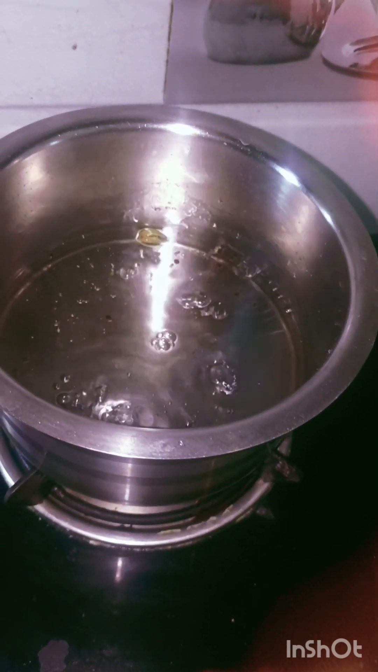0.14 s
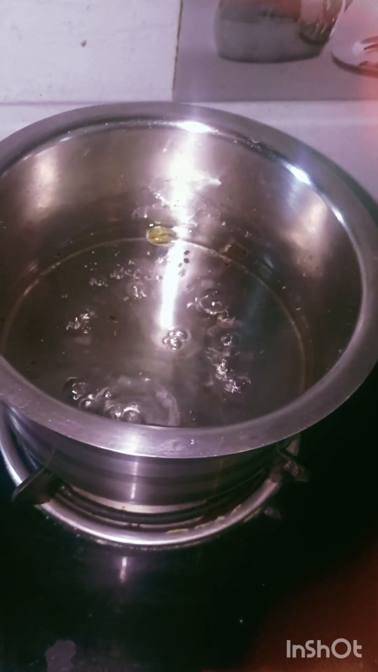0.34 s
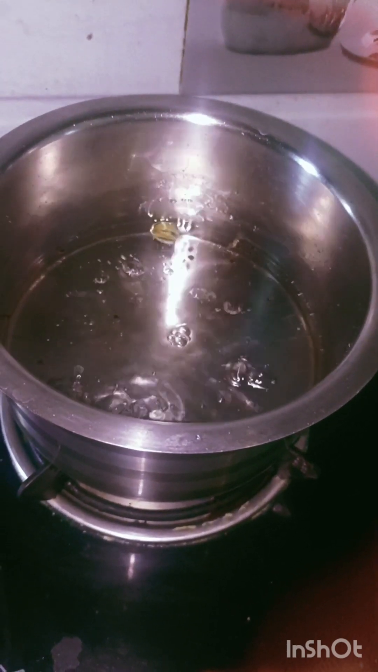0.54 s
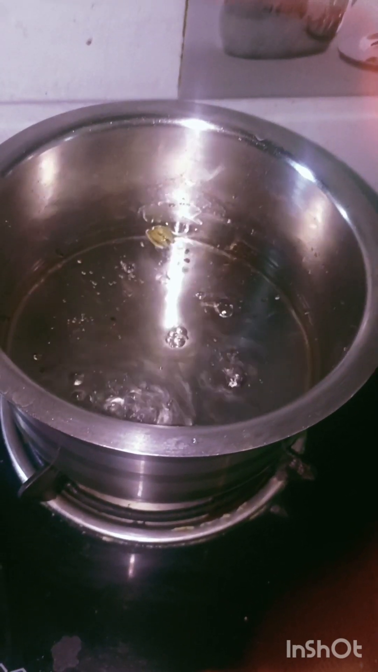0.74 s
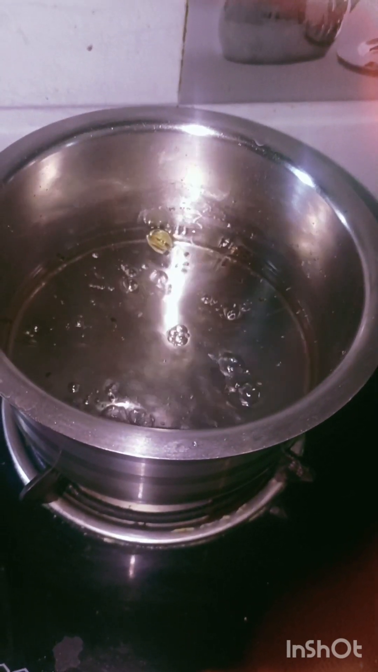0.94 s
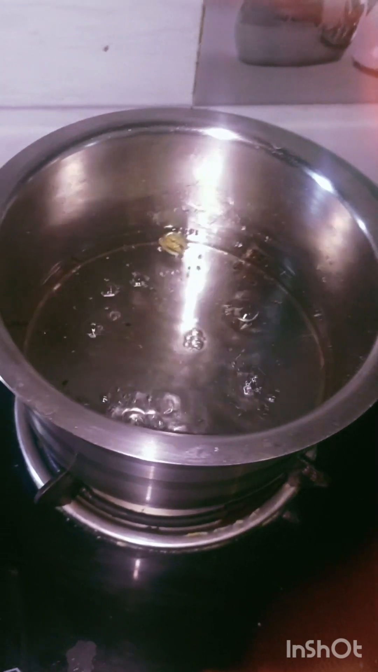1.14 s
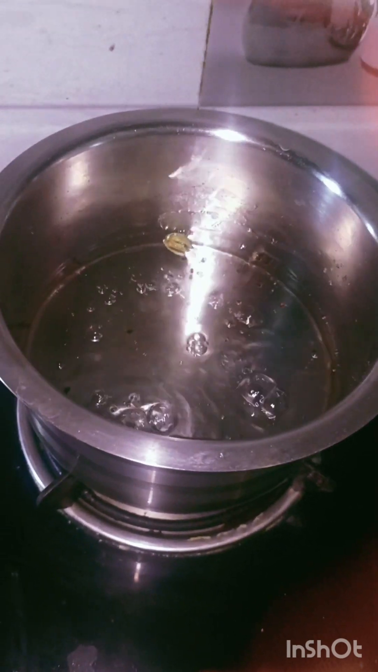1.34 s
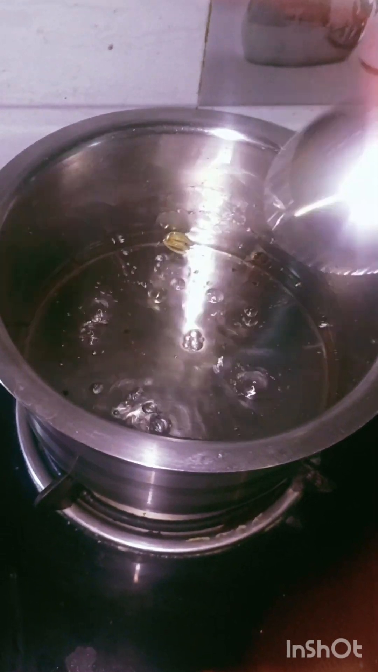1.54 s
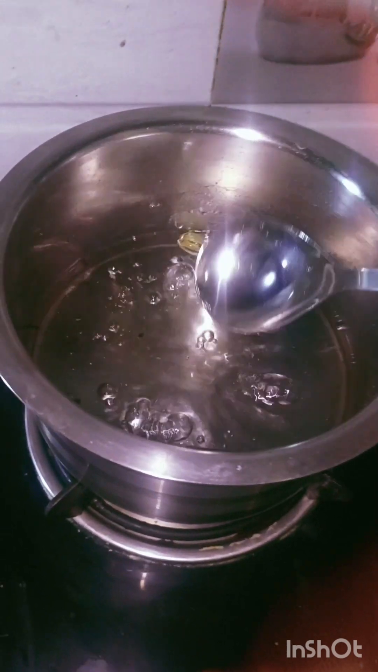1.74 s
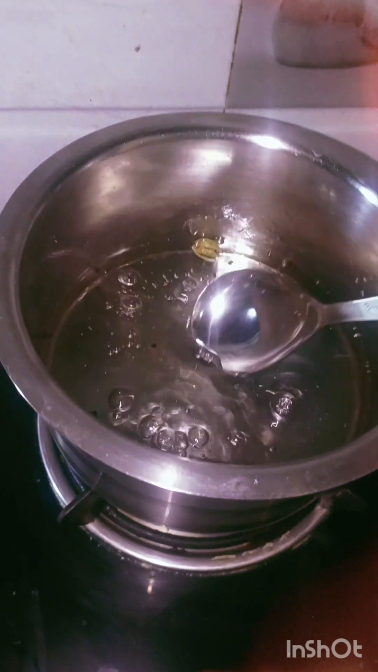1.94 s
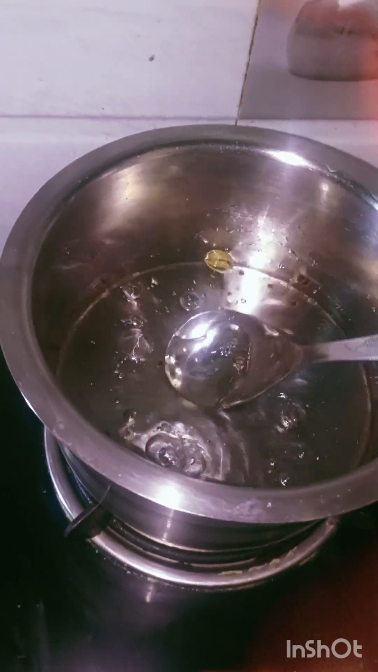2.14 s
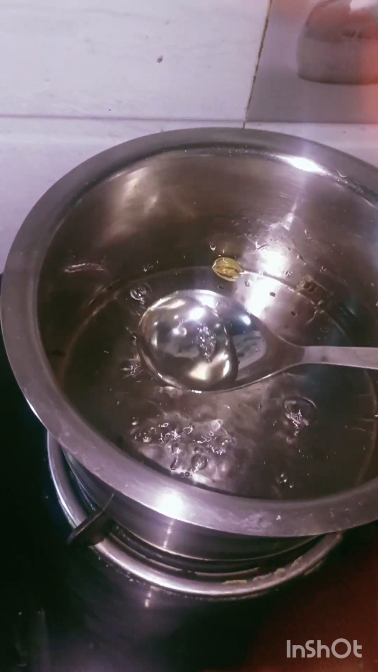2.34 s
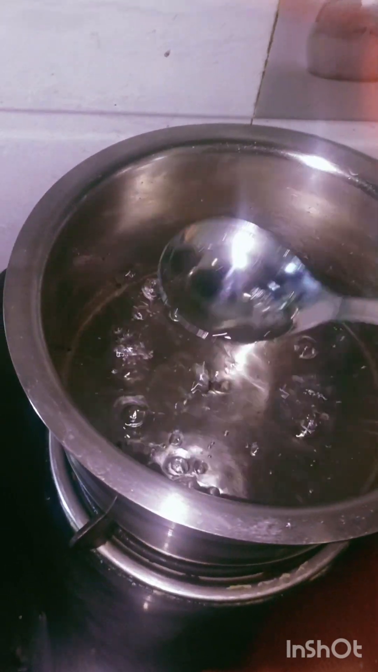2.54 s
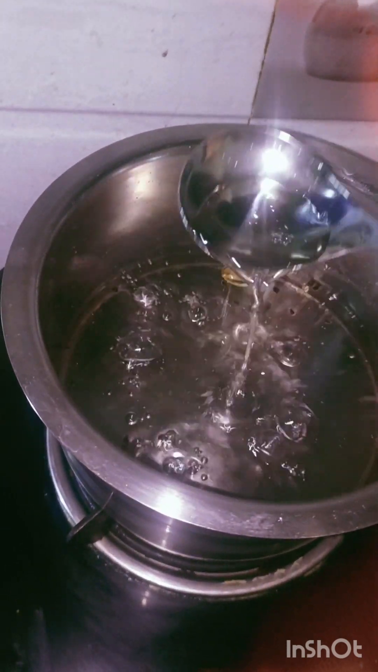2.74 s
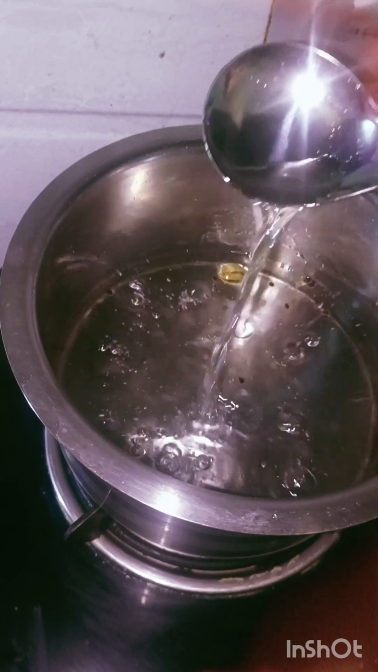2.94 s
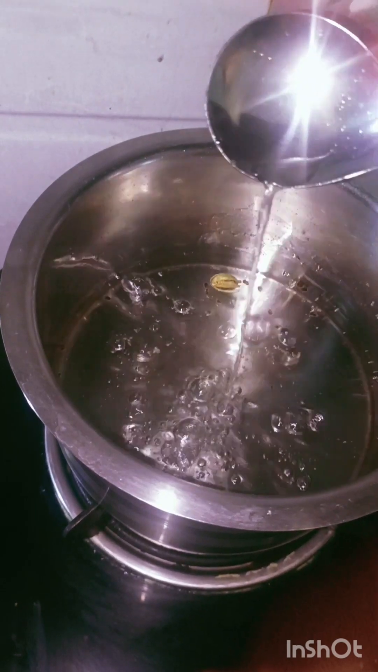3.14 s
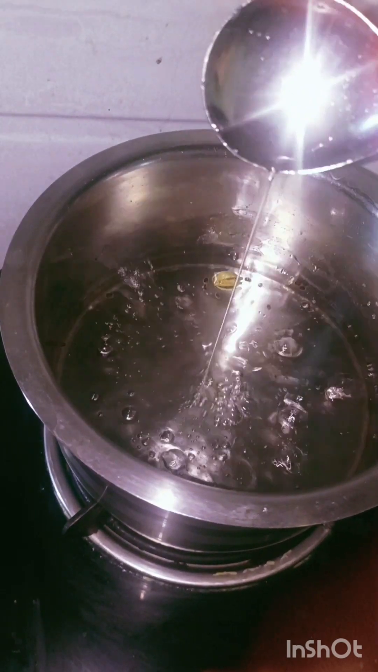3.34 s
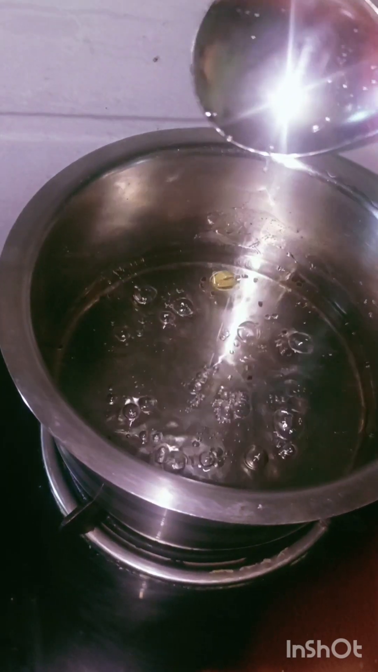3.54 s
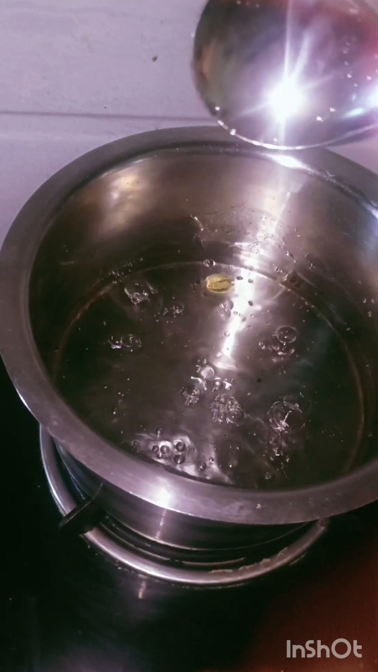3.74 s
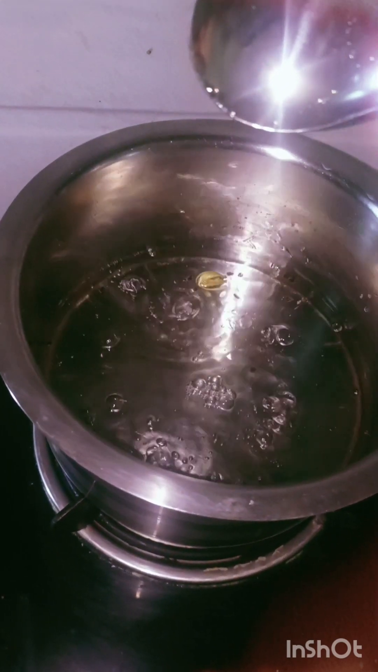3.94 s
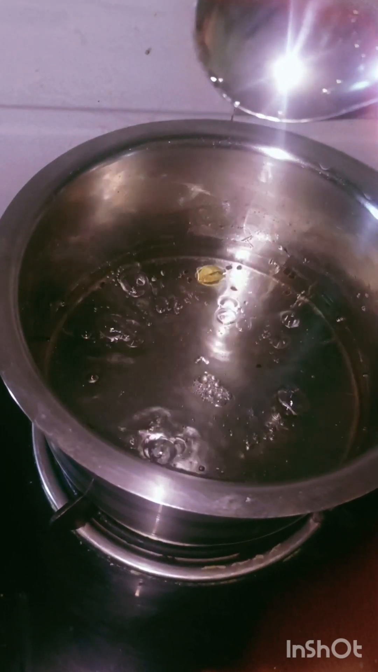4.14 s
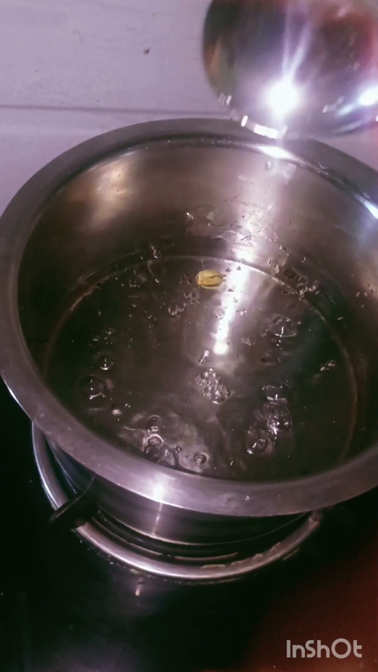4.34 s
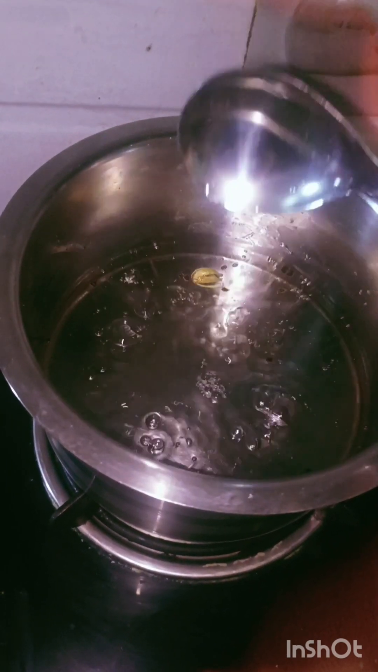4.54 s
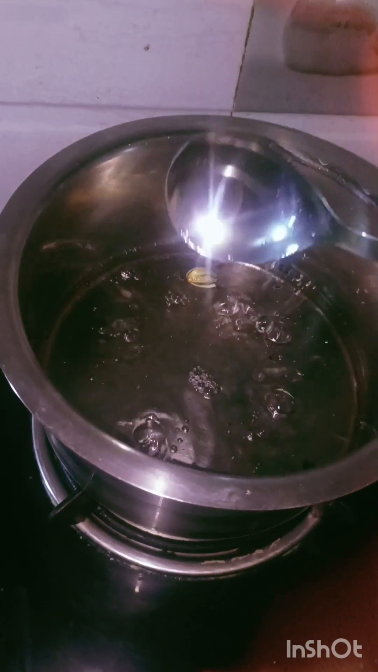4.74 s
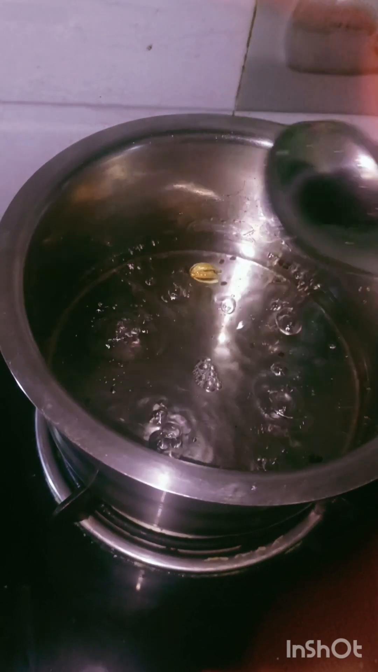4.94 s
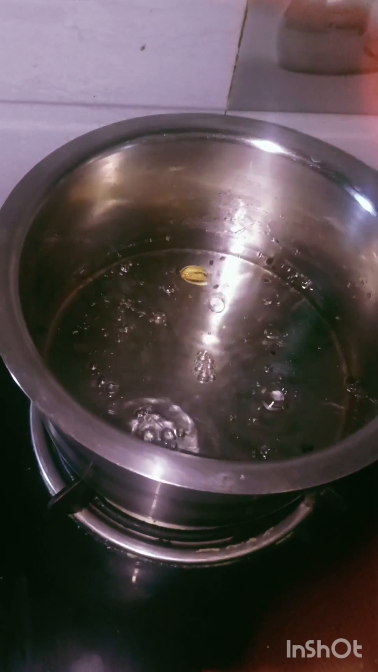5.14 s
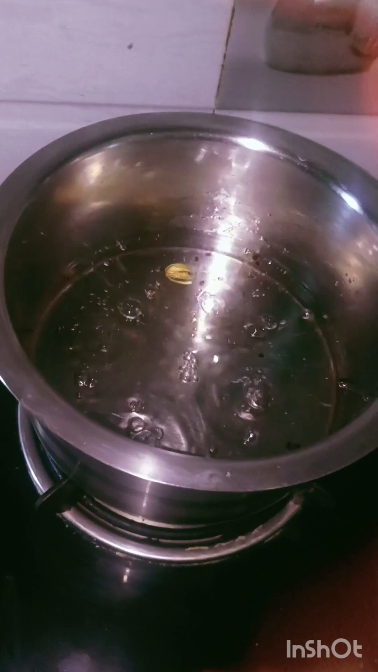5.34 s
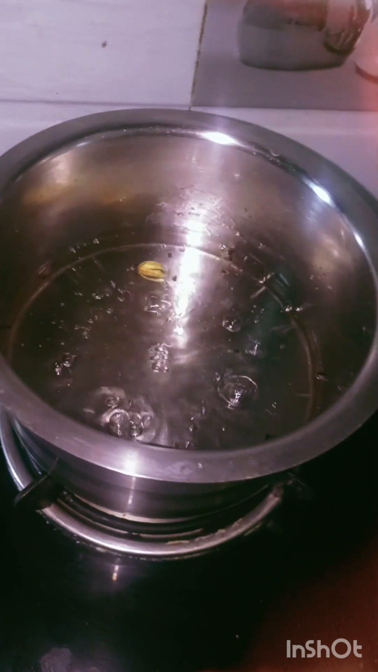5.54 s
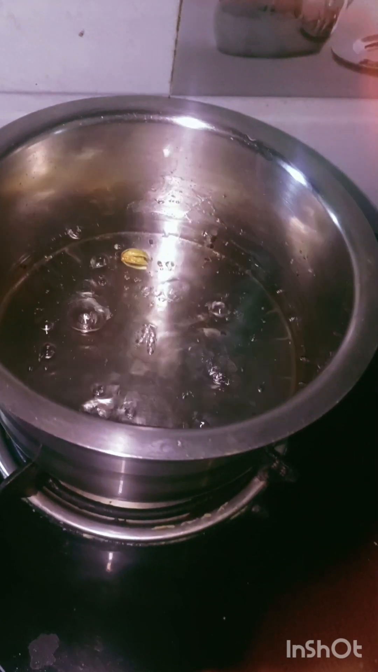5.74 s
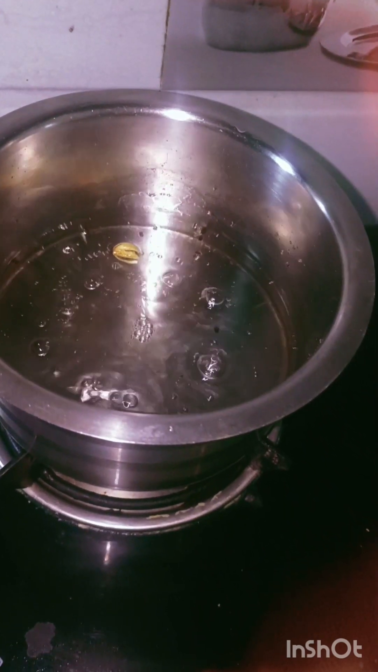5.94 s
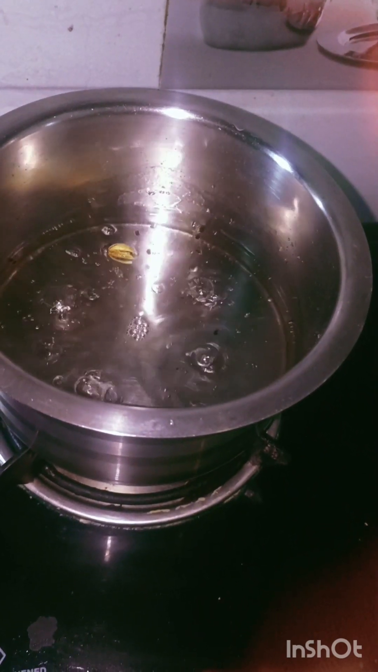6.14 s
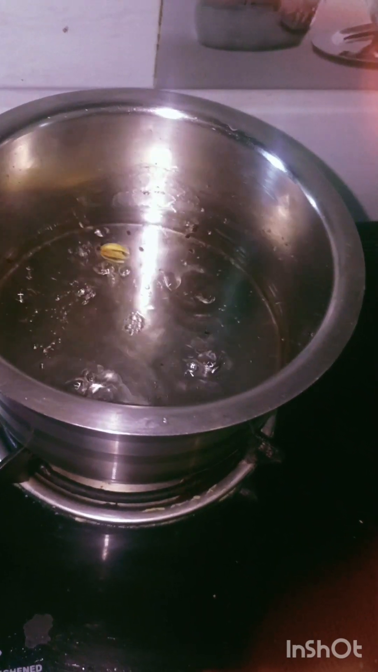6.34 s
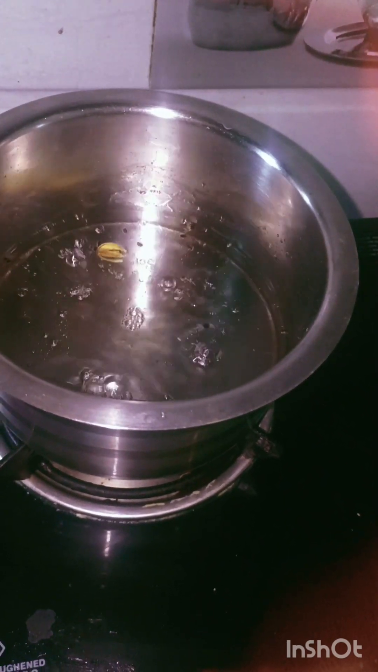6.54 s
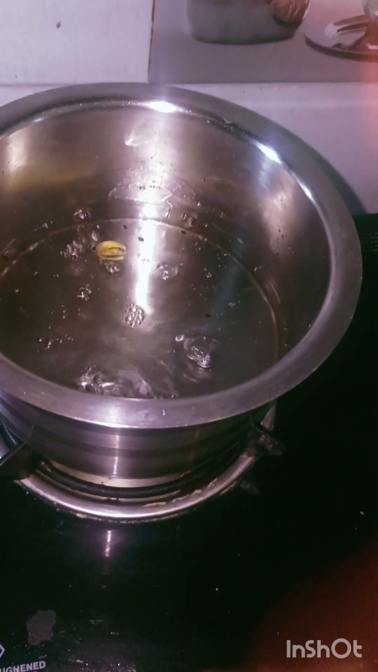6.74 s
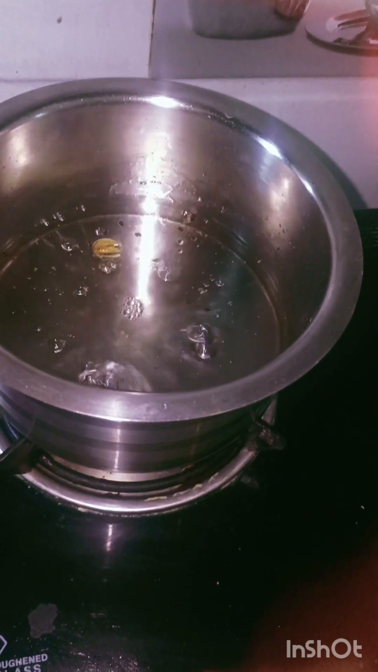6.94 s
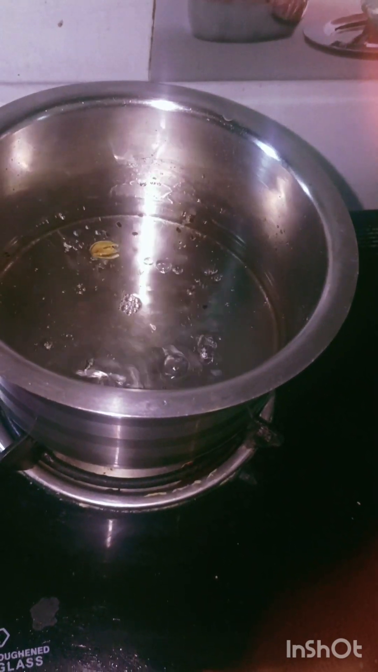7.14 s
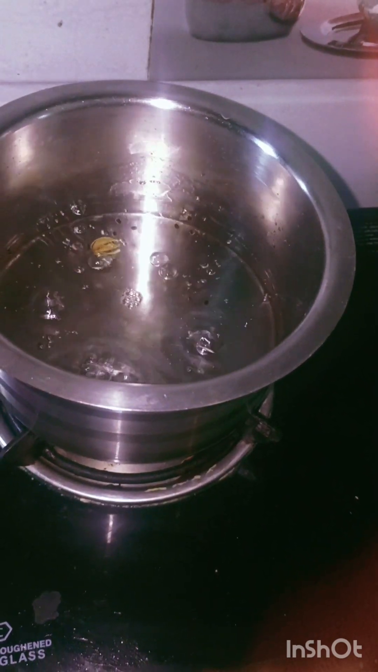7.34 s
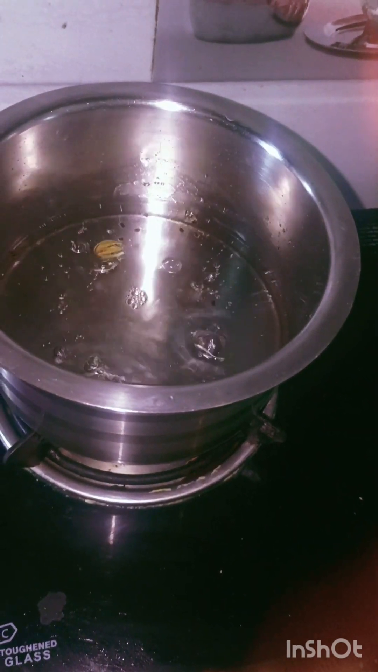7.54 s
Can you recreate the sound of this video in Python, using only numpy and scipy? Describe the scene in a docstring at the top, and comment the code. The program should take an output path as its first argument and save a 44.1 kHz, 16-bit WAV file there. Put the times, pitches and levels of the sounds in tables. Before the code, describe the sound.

Thin syrup bubbles and pops close by in a steel pot, a ladle knocks and pours it back, then steel dishes clatter farther off.

```python
"""Bubbles of simmering sugar syrup burst close by in a thin steel pot: rising notes, fizz, spray and pot ring.
A ladle then dips and pours with hollow notes and splashes; further off, steel dishes clatter in a hard-walled
kitchen as noise driven through ringing modes. Behind them lie a low hum, the burner's low rumble and patchy
hiss. A phone with two spaced microphones and a noise suppressor picks it up: steady sound is turned down,
and listed moments let hum, rumble and simmer noise through."""
import sys
import numpy as np
from scipy import signal
from scipy.fft import rfft, irfft, next_fast_len
from scipy.io import wavfile
from scipy.ndimage import uniform_filter1d

SR = 44100
rng = np.random.default_rng(int(sys.argv[2]) if len(sys.argv) > 2 else 0)


def pcm_store(signal):
    """Save signal as 16-bit PCM."""
    levels = np.round(np.clip(np.atleast_2d(signal), -1, 1) * 32767)
    wavfile.write(sys.argv[1], SR, levels.astype(np.int16).T)


def magnitude_from_level(level_db):
    """Linear magnitude for a level in decibels (20 dB per decade)."""
    exponent = np.asarray(level_db, float) / 20
    return 10 ** exponent


N = 339479  # samples in the scene

# the louder bursting bubbles; each part of the sound fades over its own share of length_s:
# start_s, level_db, pitch_hz, length_s
LOUD_BUBBLES = [(0.06, -51.5, 1110, 0.059), (0.125, -53, 5520, 0.09), (0.235, -48.5, 5550, 0.063),
                (0.426, -38.5, 3050, 0.017), (0.561, -49.5, 4300, 0.026), (0.584, -46, 1555, 0.023),
                (0.63, -55.5, 4170, 0.22), (0.765, -49, 1750, 0.028), (0.912, -43.5, 5220, 0.024),
                (0.938, -55, 3820, 0.2), (0.965, -45, 1960, 0.21), (0.999, -46, 1610, 0.072),
                (1.039, -61, 3600, 0.041), (1.076, -41.5, 570, 0.21), (1.131, -42.5, 564, 0.14),
                (1.215, -47.5, 4990, 0.071), (1.28, -55, 1620, 0.1), (1.409, -52.5, 3230, 0.095),
                (1.48, -44, 1660, 0.14), (1.566, -38, 4870, 0.011), (1.602, -46, 4920, 0.029),
                (1.669, -50.5, 4000, 0.011), (1.753, -40.5, 2520, 0.037), (1.809, -53, 3800, 0.066),
                (1.849, -48.5, 3760, 0.043), (1.914, -47, 3800, 0.095), (2.025, -39.5, 3090, 0.024),
                (2.205, -46.5, 630, 0.11), (2.408, -42.5, 664, 0.13), (2.61, -39.5, 5670, 0.073),
                (2.687, -45.5, 3150, 0.022), (2.722, -43, 3250, 0.019), (2.967, -31.5, 860, 0.025),
                (3.359, -52.5, 5350, 0.1), (3.463, -50, 1327, 0.23), (3.521, -41.5, 5340, 0.018),
                (3.597, -37.5, 1590, 0.12), (3.697, -48, 3580, 0.038), (3.747, -42.5, 5830, 0.02),
                (3.85, -45.5, 1220, 0.032), (4.017, -48, 3900, 0.019), (4.209, -52, 2240, 0.13),
                (4.549, -50, 5460, 0.11), (4.684, -47.5, 3550, 0.031), (4.819, -44.5, 3900, 0.016),
                (4.909, -43.5, 1520, 0.01), (5.019, -51.5, 3930, 0.068), (5.205, -54, 4160, 0.18),
                (5.355, -47.5, 3850, 0.08), (5.421, -56, 4320, 0.12), (5.431, -53, 1220, 0.32),
                (5.486, -51, 4150, 0.037), (7.208, -46, 1570, 0.05), (7.323, -51.5, 4800, 0.041),
                (7.61, -53.5, 5900, 0.07), (7.663, -48.5, 1274, 0.035)]
# the pot wall shades small bubbles: pitch_hz, left_over_right_db
SIDE_OF_POT = [(500, 2), (1500, 5.5), (3000, -2.5), (5500, -5)]
# the suppressor opens briefly and lets a burst of steady simmer noise through:
# start_s, hold_s, level_db, lowest_hz
SIMMER_NOISE_BURSTS = [(0.426, 0.025, -68.5, 720), (0.553, 0.033, -59.5, 714), (0.618, 0.017, -70, 2510),
                       (0.962, 0.088, -58.5, 1150), (1.073, 0.066, -68.5, 420), (1.194, 0.023, -69.5, 3020),
                       (1.569, 0.09, -60, 505), (1.747, 0.02, -60.5, 1270), (1.857, 0.063, -60.5, 1517),
                       (2.199, 0.021, -61.5, 1490), (3.062, 0.18, -59.5, 696), (3.598, 0.13, -66, 900),
                       (3.843, 0.055, -68.5, 900), (4.851, 0.063, -64.5, 687), (4.998, 0.1, -66.5, 2500),
                       (5.2, 0.038, -64, 2090), (5.428, 0.042, -70.5, 1040)]
# the pot's ringing notes, where more damping shortens the fade: pitch_hz, level_db, undamped_t60_s
POT_MODES = [(319, -11, 0.22), (516, -8.5, 0.62), (660, -17, .22), (806, -16.5, 0.39), (1220, -10, 0.96),
             (1619, -2.5, 0.2), (2139, -9, 0.045), (2442, -3, 0.1), (2968, -4.5, 0.15), (3230, -10, 0.94),
             (3910, -25.5, 0.18), (4240, -16.5, 0.22), (5230, -14.5, 0.21)]
# the ladle touches the pot, then syrup plunges back; the last two columns are relative, before fixed offsets:
# start_s, level_db, pitch_hz, splash_db, pot_ring_db
LADLE_KNOCKS = [(2.088, -29, 705, -11.5, -10), (2.252, -38, 4260, 4.5, -22.5),
                (2.274, -30.5, 406.7, -41.5, -12), (2.853, -32.5, 830, -30.5, -18.5),
                (2.895, -39, 777, -15, -18.5), (3.029, -44, 3210, -7, -18.5), (3.062, -42, 833, -7, -19.5),
                (3.086, -43.5, 3250, -2, -26), (3.101, -36, 862, -9, -23), (3.163, -38.5, 817, -11, -12.5),
                (3.186, -36.5, 2996, -13.5, -29.5), (3.211, -37.5, 827, -36, -16)]
# deeper knocks shake the stove more: pitch_hz, boom_over_knock_db
STOVE_BOOM = [(400, -4.5), (714, -28), (830, -39)]
# dishes set down or pushed; levels are before fixed offsets:
# start_s, level_db, thud_db, boom_db, scrape_length_s
DISH_BLOWS = [(5.6155, -5, -19.5, -24, 0.0088), (5.691, -18.5, -4, 2.5, 0.05),
              (5.821, -12, -21.5, -46, 0.0037), (6.132, -13, -17, -59, 0.021),
              (6.143, -20, -15.5, -34, 0.039), (6.177, -13, -12, -55, 0.028),
              (6.206, -11.5, -25, -39.5, 0.022), (6.216, -10.5, -19.5, -42.5, 0.0093),
              (6.26, -12.5, -28, -26.5, 0.0049), (6.594, -16.5, -20, -48, 0.028),
              (6.63, -20.5, -13.5, -50, 0.026), (6.783, -24.5, -17, -55.5, 0.037),
              (6.92, -37.5, -31, -46, 0.027), (7.002, -34, -14.5, -52, 0.032)]
# ringing notes of the dishes: pitch_hz, width_hz, level_db
DISH_MODES = [(1203.5, 25, -2), (1535.5, 18, 2), (1895, 112, -0.5), (2137, 28, 3.5), (2358, 90, -1.5),
              (2656, 71, -2.5), (2973, 41, 1), (3163, 36, -1), (3516, 25, -0.5), (4000, 16, -5.5),
              (4850, 8, -8.5), (5290, 20, -9), (5470, 29, -6.5), (5820, 300, -8), (6360, 58, -21.5),
              (12300, 44, -31.5), (14430, 60, -33.5)]
# relative colour of steel scraping on steel: frequency_hz, density_db (per Hz)
SCRAPE_COLOUR = [(590, -49), (1000, -25.5), (1230, -2), (1380, -6), (3530, -2.5), (4470, -11), (5530, -8.5),
                 (7000, -19), (9100, -55.5), (15400, -120)]
# relative colour of a dish's thud: frequency_hz, density_db (per Hz)
THUD_COLOUR = [(150, -58.5), (250, -15.5), (330, -2.5), (500, -3.5), (750, -7.5), (1000, -12.5),
               (1400, -42), (2200, -120)]
# a steady low hum, let through by the noise suppressor for a moment: start_s, hold_s, level_db
HUM_MOMENTS = [(.47, 0.034, -55.5), (.97, 0.044, -62), (1.17, 0.0067, -52.5), (1.42, 0.021, -64),
               (1.93, 0.055, -57), (2.12, 0.043, -53.5), (2.28, .13, -45.5), (2.6, 0.0074, -59),
               (2.93, 0.094, -50.5), (3.23, 0.083, -49), (3.61, 0.057, -53.5), (4.46, 0.0095, -57),
               (4.75, 0.013, -54), (5.49, 0.028, -56), (5.64, 0.13, -42.5), (5.93, 0.014, -50.5),
               (6.14, 0.16, -50.5), (6.53, 0.017, -60.5), (6.67, .02, -57), (6.87, 0.023, -53),
               (7.0, 0.092, -50.5)]
# a second, higher steady note is heard now and then: start_s, hold_s, level_db
OVERTONE_MOMENTS = [(.98, .07, -67.5), (2.8, .04, -59), (3.62, 0.093, -59), (6.81, 0.022, -50.5),
                    (7.06, 0.07, -59.5)]
# the burner's low rumble comes through the noise suppressor for a moment: start_s, hold_s, level_db
RUMBLE_MOMENTS = [(2.13, 0.018, -82), (2.45, 0.01, -59.5), (2.59, 0.011, -78.5), (3.87, 0.036, -71),
                  (4.15, 0.37, -66.5), (4.88, 0.017, -75), (5.65, 0.84, -76), (7.3, 0.16, -60)]
# relative colour of simmer and flame, before the pot wall: frequency_hz, density_db (per Hz)
HISS_COLOUR = [(110, -12), (258, -10.5), (353, -3), (600, -14.5), (900, -17.5), (1400, -21.5),
               (3880, -16.5), (5760, -10), (6810, -20), (8930, -11), (10300, -24.5), (11500, -24),
               (15000, -17), (16200, -39)]
# how long the kitchen echoes, before each source takes its share: frequency_hz, t60_s
KITCHEN_ECHO = [(100, 0.2), (500, 0.5), (2000, 0.58), (6000, 0.57), (10000, 0.41), (16000, 0.18)]
# how alike the two microphones hear spread-out sound: frequency_hz, likeness (-1 to 1)
MIC_LIKENESS = [(60, 1), (300, 0.58), (640, 0.47), (1400, 0.08), (3000, -0.17), (7000, 0.05)]
# tone of the two microphone ports: frequency_hz, left_over_right_db
PORT_BALANCE = [(300, -1), (1300, 3), (5500, -6.5), (7500, 7.5), (10500, 14.5), (12000, -2.5), (16000, 6.5)]
# suppressor threshold: frequency_hz, over_usual_level_db
DUCK_THRESHOLD = [(100, 6), (350, 9.5), (550, 18), (900, 2), (1500, 0.5), (16000, 5)]
# deepest cut by the suppressor: frequency_hz, gain_db
DEEPEST_CUT = [(100, 1), (350, -12), (550, -10.5), (900, -8), (1500, -2.5), (7000, -11.5), (16000, -14)]

# the fainter bubbles, at random times; both spreads are random scatter, the pitch one on a log scale
FAINT_DB, FAINT_SPREAD_DB, FAINT_HZ, FAINT_PITCH_SPREAD, FAINT_LENGTH_S = -59, 1, 3280, .45, 0.028
# spray over a bubble of -54 dB; dB of change per dB of bubble; scatter
SPRAY_DB, SPRAY_GROWS, SPRAY_SPREAD_DB = -11, -1.06, 4
BURST_RISE_S, BURST_FALL_DB_S, BURST_TOP_HZ, BURST_ROUGH_DB = 0.0028, 502, 5330, 2.5
# harder blows are brighter: treble over a blow of 0 dB; dB more per dB of blow
EDGE_DB, EDGE_GROWS = -8, 0.48
HUM_REST_DB, HUM_RISE_DB_S, HUM_FALL_DB_S = -74, 304, 273
HUM_WAVERS_DB, HUM_WAVERS_HZ = 6, 7  # rms size and fastest rate, for the resting level only
OVERTONE_HZ = 519
RUMBLE_REST_DB, RUMBLE_RISE_DB_S, RUMBLE_FALL_DB_S = -86.5, 134, 117
HISS_DB = -65.5  # before it turns patchy


def unit(x):
    """Scales the last axis to rms 1."""
    return x / np.sqrt(np.mean(x ** 2, axis=-1, keepdims=True) + 1e-20)


def along(points, hz):
    """Reads a value between (Hz, value) points on a log frequency axis."""
    f, v = np.transpose(points)
    return np.interp(np.log(hz + 1), np.log(f + 1), v)


def filtered(x, response):
    """Multiplies the spectrum of x by a response, a function of frequency."""
    m = next_fast_len(x.shape[-1] + 4096)
    return irfft(rfft(x, m) * response(np.fft.rfftfreq(m, 1 / SR)), m)[..., :x.shape[-1]]


def noise(count, size, gain):
    """Rows of coloured noise, rms 1."""
    return unit(filtered(rng.standard_normal((count, size)), gain))


def band(lo_hz, hi_hz):
    """Gain of a steep band-pass."""
    return lambda f: 1 / np.sqrt((1 + (lo_hz / (f + 1)) ** 8) * (1 + (f / hi_hz) ** 8))


def near(hz, width):
    """Bell-shaped gain around a pitch; the width is in natural-log units of frequency."""
    return lambda f: np.exp(-.5 * (np.log((f + 1) / hz) / width) ** 2)


def fade(t, t60_s):
    """Dies away by 60 dB in t60_s."""
    return magnitude_from_level(-60 * t / t60_s)


def soft_start(t, rise_s):
    """Swells smoothly from 0 towards 1."""
    return 1 - np.exp(-t / rise_s)


def swells(rows, rest_db, rise_db_s, fall_db_s):
    """A resting level with moments that rise, hold and fall."""
    t = np.arange(N) / SR
    level = magnitude_from_level(rest_db)
    for start, hold, db in rows:
        rise_db = rise_db_s * np.maximum(start - t, 0)
        fall_db = fall_db_s * np.maximum(t - start - hold, 0)
        level = level + magnitude_from_level(db - rise_db - fall_db)
    return level


def diffuse(z, hz):
    """Mixes two unrelated spectra to the likeness that spaced microphones hear."""
    turn = np.arccos(np.clip(along(MIC_LIKENESS, hz), -1, 1))[:, None] / 2
    mid = z[..., 0, :, :] * np.cos(turn)
    side = z[..., 1, :, :] * np.sin(turn)
    return np.stack([mid + side, mid - side], axis=-3)


def place(sounds, times, pan_db, lag_s, wet_db, t60_share, tail_s):
    """Each sound reaches the two ports directly and through its own fading noise tail of the room."""
    hz, t, z = signal.stft(rng.standard_normal((len(times), 2, round(tail_s * SR))), SR, nperseg=256)
    decay = fade(t, t60_share * along(KITCHEN_ECHO, hz)[:, None])
    tails = signal.istft(diffuse(z, hz) * decay, SR, nperseg=256)[1]
    tails = magnitude_from_level(wet_db) * unit(tails) / np.sqrt(tails.shape[-1])
    # direct sound: a positive lag makes the left port hear it later
    tails[:, 0, max(round(lag_s * SR), 0)] += 1
    tails[:, 1, max(round(-lag_s * SR), 0)] += 1
    pan = magnitude_from_level(np.outer(pan_db, [.5, -.5]))[..., None]
    heard = signal.fftconvolve(sounds[:, None], tails, axes=2) * pan
    out = np.zeros((2, N + heard.shape[-1]))
    for s, sound in zip(times, heard):
        start = round(s * SR)
        out[:, start:start + sound.shape[-1]] += sound
    return out[:, :N]


def pot_ring(near_hz, t, damping, reach):
    """The pot's modes at new strengths for every blow, most of all those near the blow's own pitch."""
    hz, db, t60 = np.transpose(POT_MODES)
    strength = magnitude_from_level(db + 3 * rng.standard_normal((len(near_hz), len(hz))))
    strength = strength * np.exp(-.5 * (np.log(hz / near_hz) / reach) ** 2)
    modes = fade(damping * t, t60[:, None]) * np.sin(2 * np.pi * hz[:, None] * t)
    return strength @ modes


def simmer(count=45):
    """Lists all bubbles: the louder ones and a random scatter of faint ones."""
    s, draw = rng.random(count) * N / SR, rng.standard_normal((count, 3))
    db = FAINT_DB + FAINT_SPREAD_DB * draw[:, 0]
    hz = np.clip(FAINT_HZ * np.exp(FAINT_PITCH_SPREAD * draw[:, 1]), 400, 6500)
    length = FAINT_LENGTH_S * np.exp(0.37 * draw[:, 2])
    return np.hstack([np.transpose(LOUD_BUBBLES), [s, db, hz, length]])


def bubbles(bursts):
    """A bubble rings a few cycles with rising pitch, throws spray and nudges the pot."""
    s, db, hz, length = bursts[..., None]
    spray_db = SPRAY_DB + SPRAY_GROWS * (db + 54) + SPRAY_SPREAD_DB * rng.standard_normal(s.shape)
    t = np.arange(SR // 5) / SR
    cycles = hz * t
    note = np.sin(2 * np.pi * cycles * (1 + 0.0019 * cycles))
    note *= fade(t, 0.24 * length) * soft_start(cycles, 0.65)
    fizz = noise(len(s), len(t), near(hz, 0.28))
    fizz *= magnitude_from_level(-3) * fade(t, 0.63 * length) * soft_start(t, 0.1 * length)  # long bursts start softly
    spray = magnitude_from_level(spray_db) * fade(t, 0.51 * length) * noise(len(s), len(t), band(2600, 24000))
    ring = magnitude_from_level(-16.5) * pot_ring(hz, t, damping=3.2, reach=1.0)
    sound = magnitude_from_level(db) * (note + fizz + spray + ring)
    pan_db = along(SIDE_OF_POT, hz[:, 0]) + 4 * rng.standard_normal(len(s))
    return place(sound, s[:, 0], pan_db, lag_s=.0003, wet_db=-3.0, t60_share=0.15, tail_s=0.2)


def simmer_noise():
    """Brief bursts of steady simmer noise let through: rough, from a lowest pitch up, coloured by the pot wall."""
    s, hold, db, low_hz = np.transpose(SIMMER_NOISE_BURSTS)[..., None]
    t = np.arange(SR // 2) / SR

    def colour(f):
        wall = 1 + sum(2.5 / (1 + ((f - c) / 40) ** 2) for c, _, _ in POT_MODES)
        return wall * band(low_hz, 16000)(f) / np.sqrt(1 + (f / BURST_TOP_HZ) ** 4)

    steady = noise(len(s), len(t), colour)
    rough = magnitude_from_level(BURST_ROUGH_DB * noise(len(s), len(t), band(11, 200)))
    level = magnitude_from_level(db - BURST_FALL_DB_S * np.maximum(t - hold, 0)) * soft_start(t, BURST_RISE_S)
    sound = unit(steady * rough) * level
    return place(sound, s[:, 0], np.full(len(s), -1.5), lag_s=.00025, wet_db=-4.5, t60_share=0.15, tail_s=0.13)


def prickle(bursts, count=2400):
    """Bursts set off a swarm of tiny bubbles that ping near a pot mode or the burst's pitch; some spit spray."""
    draw = rng.random((count, 6))
    s, db, parent_hz = bursts[:3, np.arange(count) % bursts.shape[1], None]
    # the three lowest modes are left out
    mode = 3 + (draw[:, :1] * (len(POT_MODES) - 3)).astype(int)
    mode_hz = np.transpose(POT_MODES)[0][mode]
    hz = np.where(draw[:, 5:] < .4, parent_hz, mode_hz) * (1 + .05 * (draw[:, 1:2] - .5))
    size = magnitude_from_level(-53.0 + 0.58 * db - 6.7 * np.log(draw[:, 2:3] + 0.0098))  # a few are larger
    t = np.arange(SR // 30) / SR
    ping = np.sin(2 * np.pi * hz * t) * fade(t, 0.062) * soft_start(t, 0.00084)
    spit = magnitude_from_level(-2.5) * fade(t, 0.016) * noise(count, len(t), band(4600, 16000)) * (draw[:, 3:4] < .3)
    late = -.045 * np.log(draw[:, 4:5] + 1e-4)  # the swarm thins out
    at = (np.minimum(s + late, N / SR) * SR).astype(int) + np.arange(len(t))
    pan_db = along(SIDE_OF_POT, hz) + 5 * rng.standard_normal((count, 1))
    ports = []
    for lag, sign in ((13, 1), (0, -1)):  # the left port hears them 13 samples later
        side = size * (ping + spit) * magnitude_from_level(sign * pan_db / 2)
        ports.append(np.bincount((at + lag).ravel(), side.ravel(), N + SR)[:N])
    return np.array(ports)


def ladle():
    """A short hollow note, a splash of noise, a slosh, a stove boom and the ring of the pot."""
    s, db, hz, splash_db, ring_db = np.transpose(LADLE_KNOCKS)[..., None]
    t = np.arange(SR // 2) / SR
    note = np.sin(2 * np.pi * hz * t) * fade(t, 0.11) * soft_start(t, 0.0025)
    splash = magnitude_from_level(splash_db + 4.0) * fade(t, 0.055) * noise(len(s), len(t), band(750, 7000))
    splash += magnitude_from_level(splash_db - 7.5) * fade(t, 0.03) * noise(len(s), len(t), band(5300, 16000))
    slosh = magnitude_from_level(ring_db + 9.5) * fade(t, 0.15) * soft_start(t, 0.00087)
    slosh = slosh * noise(len(s), len(t), near(hz, 0.73))
    boom = magnitude_from_level(along(STOVE_BOOM, hz)) * (t / 0.074) * np.exp(-t / 0.045)
    boom = boom * noise(len(s), len(t), band(120, 260))
    ring = magnitude_from_level(ring_db) * pot_ring(hz, t, damping=1.22, reach=1.65)
    sound = magnitude_from_level(db) * (note + splash + slosh + boom + ring)
    return place(sound, s[:, 0], np.full(len(s), -2.5), lag_s=0.00022, wet_db=-8.0, t60_share=1.0, tail_s=0.34)


def dish_response(f):
    """Steel dishes ring as a row of resonances with alternating sign."""
    total = 0
    for k, (centre, width, db) in enumerate(DISH_MODES):
        damped = 1j * f * width
        total = total + (-1) ** k * magnitude_from_level(db) * damped / (centre * centre - f * f + damped)
    return total


def clatter():
    """Steel chatters on steel for a moment, ringing the far dishes, with thuds and a long room tail."""
    s, db, thud_db, boom_db, length = np.transpose(DISH_BLOWS)[..., None]
    t = np.arange(SR // 4) / SR
    # the contact jumps in level every 64 samples
    jitter = magnitude_from_level(rng.standard_normal((len(s), len(t) // 64 + 1))).repeat(64, axis=1)[:, :len(t)]
    contact = (0.36 * np.exp(-t / 0.0031) + np.exp(-(t / length) ** 4)) * jitter
    chatter = contact * noise(len(s), len(t), lambda f: magnitude_from_level(along(SCRAPE_COLOUR, f)))
    edge = magnitude_from_level(EDGE_DB + EDGE_GROWS * db) * contact * noise(len(s), len(t), band(3500, 31000))
    rung = magnitude_from_level(17.5) * filtered(contact * noise(len(s), len(t), band(720, 21000)), dish_response)
    thud = magnitude_from_level(thud_db + 7.0) * fade(t, 0.27) * soft_start(t, 0.0042)
    thud = thud * noise(len(s), len(t), lambda f: magnitude_from_level(along(THUD_COLOUR, f)))
    boom = magnitude_from_level(boom_db) * (t / 0.035) * np.exp(-t / 0.023) * noise(len(s), len(t), band(160, 190))
    sound = magnitude_from_level(db - 14) * (chatter + edge + rung + thud + boom)
    left, right = place(sound, s[:, 0], np.full(len(s), 1.2), lag_s=-0.00024, wet_db=-6.0,
                        t60_share=1.25, tail_s=.7)
    shade = lambda f: 1 - 0.62 * band(7000, 11500)(f)  # the phone's body hides the right port
    return np.array([left, filtered(right, shade)])


def low_hum():
    """A steady low hum, slightly drifting in pitch, let through for moments; a higher note joins at times."""
    drift = noise(1, N, band(.3, 6.18))[0]
    hum = np.sqrt(2) * np.sin(2 * np.pi * np.cumsum(348 + 3 * drift) / SR)
    rest_db = HUM_REST_DB + HUM_WAVERS_DB * noise(1, N, band(1.5, HUM_WAVERS_HZ))[0]
    hum = hum * swells(HUM_MOMENTS, rest_db, HUM_RISE_DB_S, HUM_FALL_DB_S)
    overtone = np.sin(2 * np.pi * OVERTONE_HZ * np.arange(N) / SR) * swells(OVERTONE_MOMENTS, -95, 400, 500)
    return hum * magnitude_from_level([[-1.5], [1.5]]) + overtone


def burner():
    """The burner's low rumble is narrow-band noise, nearly alike at both ports, let through for moments."""
    both, apart = noise(2, N, lambda f: band(72, 105)(f) ** 2)
    rumble = both + 0.1 * np.outer([1, -1], apart)
    return rumble * swells(RUMBLE_MOMENTS, RUMBLE_REST_DB, RUMBLE_RISE_DB_S, RUMBLE_FALL_DB_S)


def hiss():
    """The fine hiss of simmer and flame, coloured by the pot, comes and goes in patches."""
    def colour(f):
        # the wall favours its modes
        wall = 2.0 + sum(3.9 / (1 + ((f - c) / 25) ** 2) for c, _, _ in POT_MODES)
        return magnitude_from_level(along(HISS_COLOUR, f)) * wall

    hz, t, z = signal.stft(noise(2, N, colour), SR, nperseg=512)
    field = rng.standard_normal(z.shape[1:])
    field = uniform_filter1d(uniform_filter1d(field, 45, 0), 4, 1)  # wide in pitch and brief
    patch_db = along([(300, 2.8), (1000, 2.3), (3000, 5.2)], hz)[:, None]  # (Hz, rms dB)
    patches = magnitude_from_level(patch_db * field / field.std())
    return magnitude_from_level(HISS_DB) * signal.istft(diffuse(z, hz) * patches, SR, nperseg=512)[1][:, :N]


def scene():
    """Adds up pot, ladle, dishes and stove."""
    bursts = simmer()
    pot = bubbles(bursts) + simmer_noise() + prickle(bursts)
    return pot + ladle() + clatter() + low_hum() + burner() + hiss()


def suppress(x):
    """Bands that stay near their usual quiet level are turned down; a pop also opens its neighbours in pitch."""
    hz, t, z = signal.stft(x, SR, nperseg=512)
    power = np.mean(np.abs(z) ** 2, axis=0)
    power = np.abs(uniform_filter1d(uniform_filter1d(power, 6, 0), 4, 1))
    usual = np.percentile(power, 30, axis=1, keepdims=True)
    over = power / (usual * magnitude_from_level(2 * along(DUCK_THRESHOLD, hz))[:, None])
    share = over / (1 + over)
    share = np.maximum(share, 0.75 * uniform_filter1d(share, 50, 0))
    gain = np.maximum(share ** 1.133, magnitude_from_level(along(DEEPEST_CUT, hz))[:, None])
    return signal.istft(z * gain, SR, nperseg=512)[1][:, :N]


def top_cut(x):
    """Nothing passes above the cut-off."""
    return signal.sosfilt(signal.butter(12, 17000, fs=SR, output="sos"), x)


def record(dry):
    """The two ports differ in tone and pass a limited band; then the suppressor acts on both."""
    def port_tone(f):
        return magnitude_from_level(np.outer([.5, -.5], along(PORT_BALANCE, f))) * band(60, 16300)(f)

    mix = suppress(filtered(dry, port_tone))
    return top_cut(mix)


dry = scene()
out = record(dry)
pcm_store(out)
```